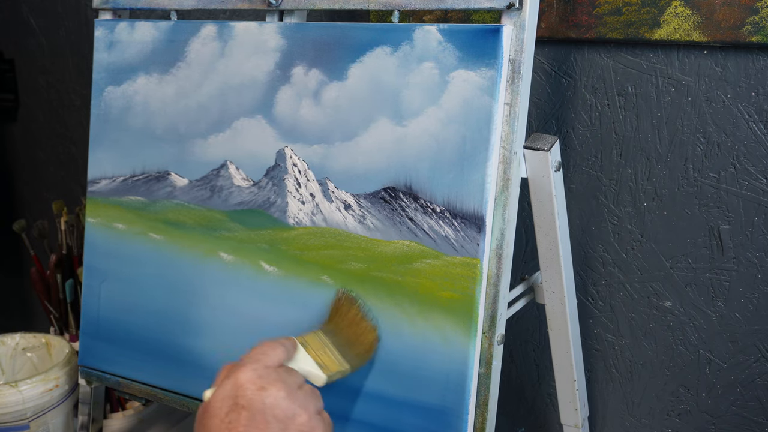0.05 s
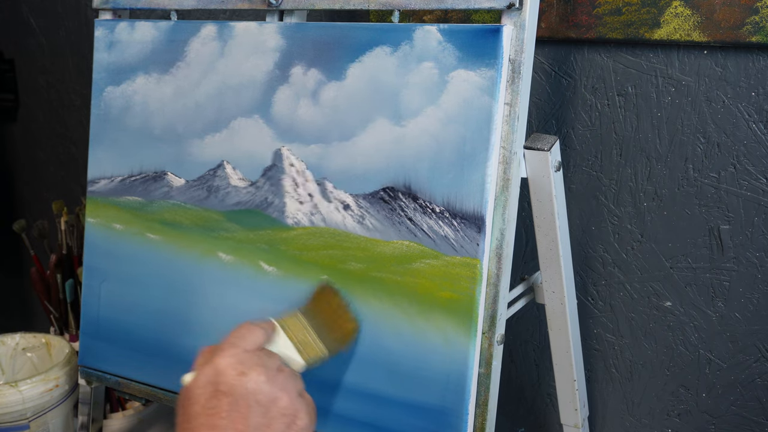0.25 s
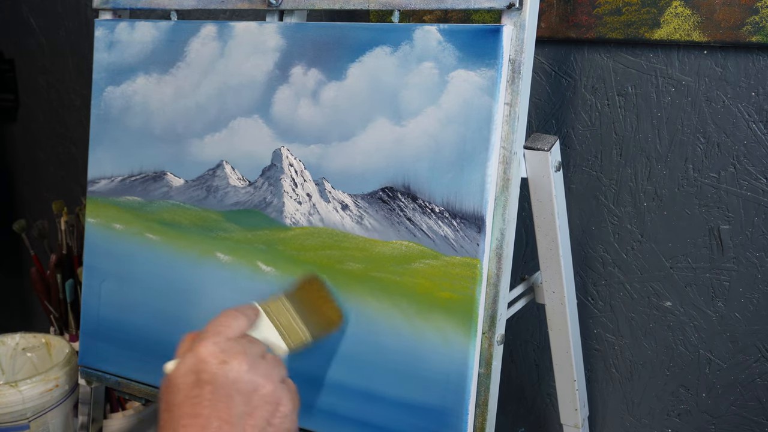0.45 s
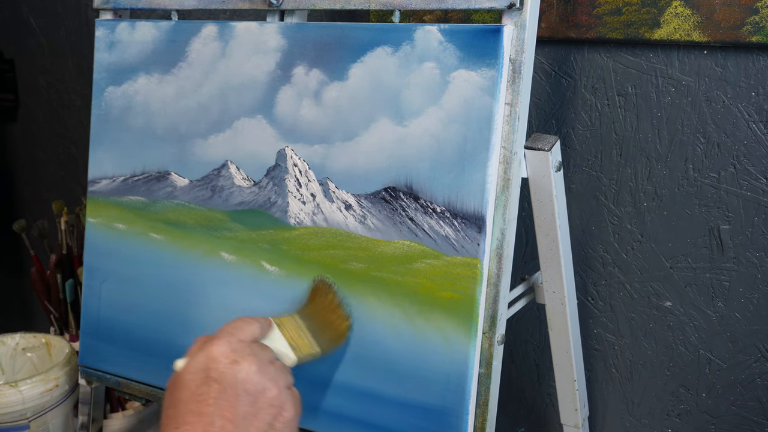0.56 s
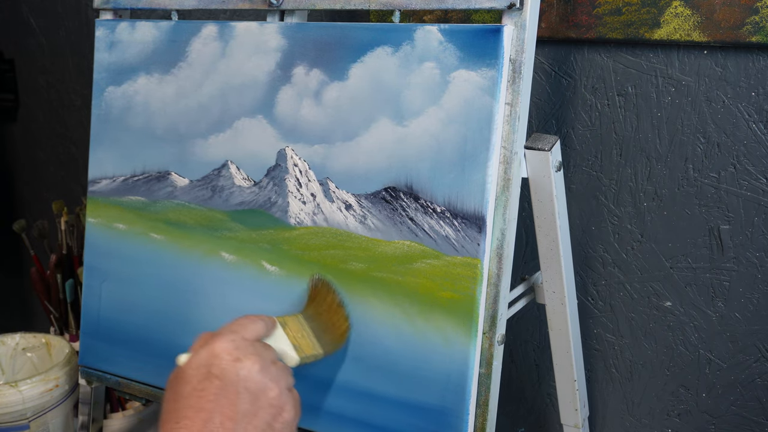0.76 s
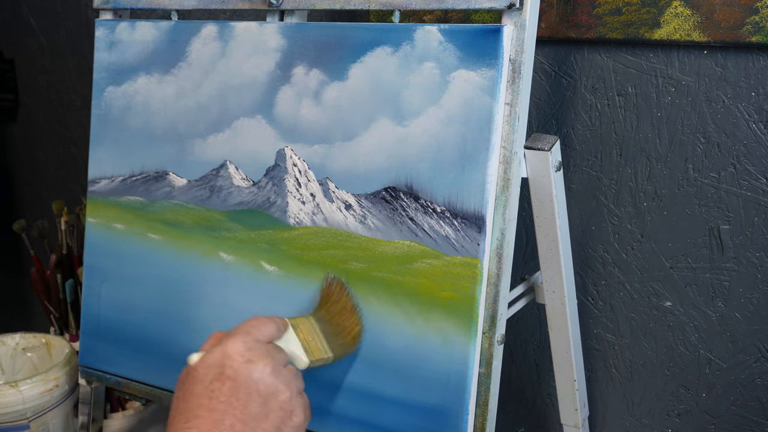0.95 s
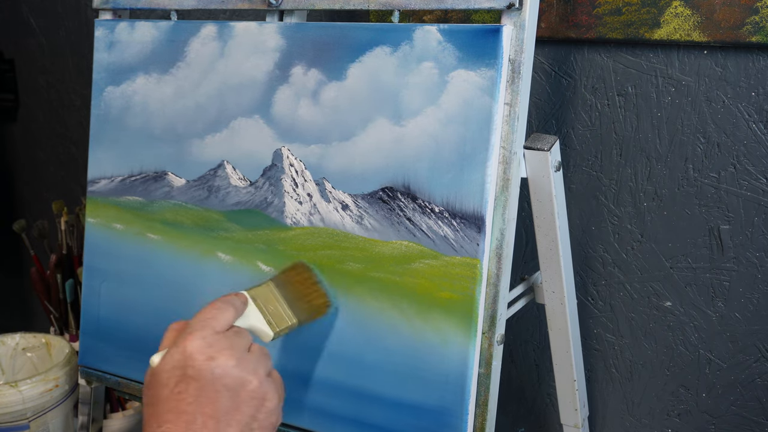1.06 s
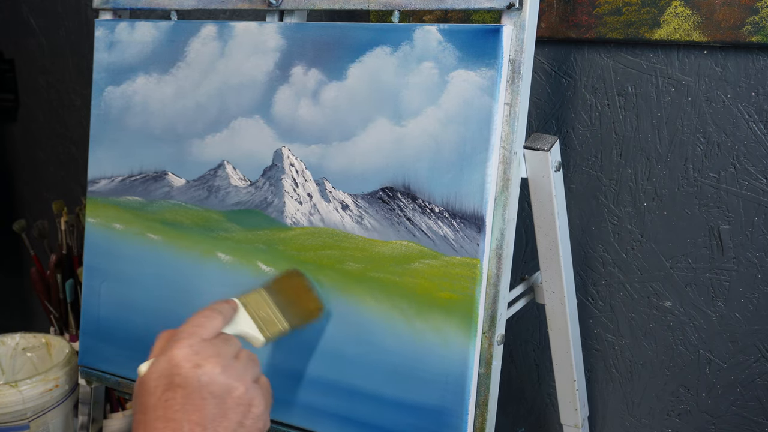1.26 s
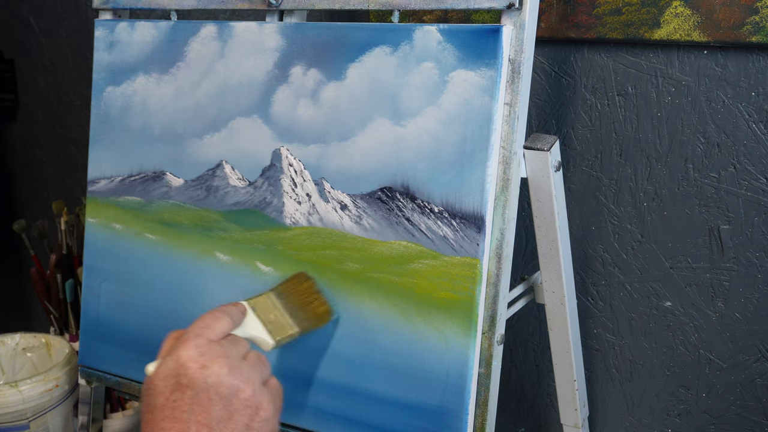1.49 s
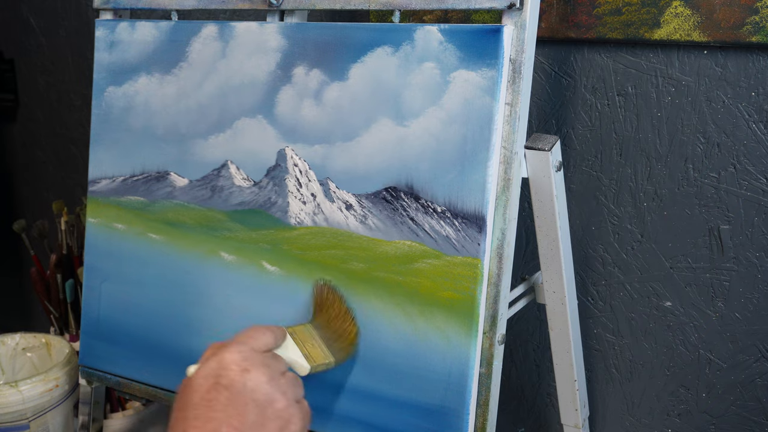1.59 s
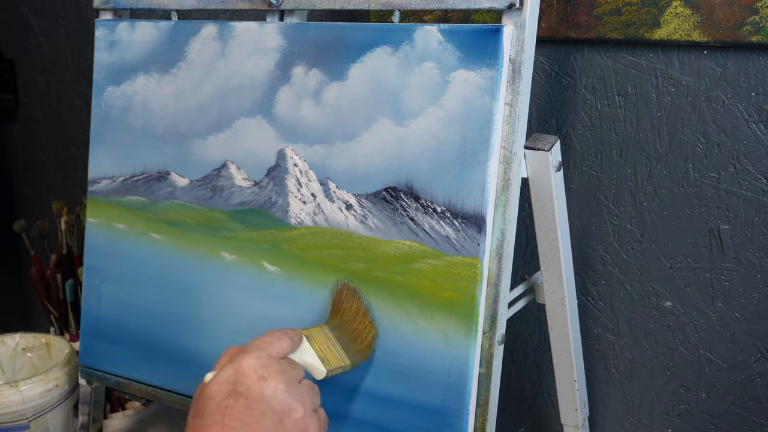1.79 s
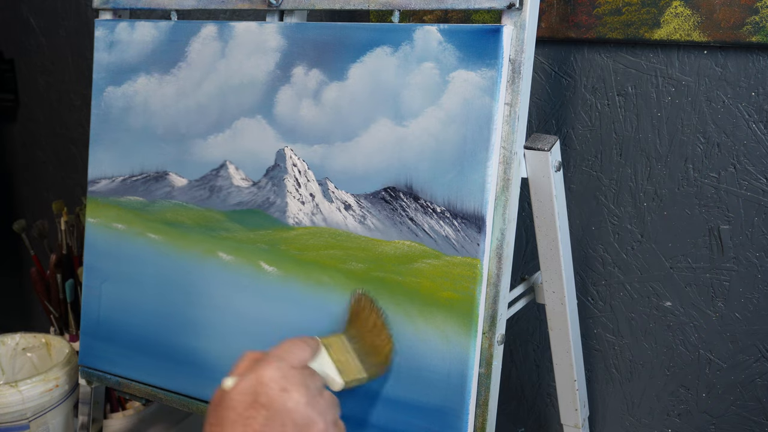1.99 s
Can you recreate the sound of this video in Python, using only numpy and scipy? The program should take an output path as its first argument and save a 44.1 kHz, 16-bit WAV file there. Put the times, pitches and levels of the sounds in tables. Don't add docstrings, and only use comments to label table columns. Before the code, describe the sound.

Soft wide paintbrush dabbing a stretched canvas in quick, steady strokes in a quiet studio

```python
import sys
import numpy as np
from scipy import signal
from scipy.fft import rfft, irfft, next_fast_len
from scipy.io import wavfile
from scipy.ndimage import uniform_filter1d

SR = 44100
rng = np.random.default_rng(int(sys.argv[2]) if len(sys.argv) > 2 else 0)


def ratio(d):
    e = np.asarray(d, float) / 20
    return 10 ** e


def master_out(mix):
    frames = np.transpose(np.atleast_2d(mix))
    ceiling = np.clip(frames, -1, 1)
    pcm = np.round(ceiling * 32767).astype(np.int16)
    wavfile.write(sys.argv[1], SR, pcm)


N = 89611
TIME_S = np.arange(N) / SR


def rms_one(x):
    return x / np.sqrt(np.mean(x ** 2) + 1e-20)


def colour(x, points, peaks=()):
    size = next_fast_len(N + SR // 2)
    size += size % 2
    hz = np.maximum(np.fft.rfftfreq(size, 1 / SR), 1)
    point_hz, point_db = np.array(points).T
    db = np.interp(np.log(hz), np.log(point_hz), point_db)
    for peak_hz, width_hz, peak_db in peaks:
        db = db + peak_db / (1 + (2 * (hz - peak_hz) / width_hz) ** 2)
    cepstrum = irfft(db * np.log(10) / 20, size)
    cepstrum[1:size // 2] *= 2
    cepstrum[size // 2 + 1:] = 0
    response = np.exp(rfft(cepstrum))
    return rms_one(irfft(rfft(x, size) * response, size)[:N])


def grains(per_s, spread_db):
    sizes = ratio(spread_db * np.minimum(rng.exponential(1, N), 5))
    signs = rng.choice([-1, 1], N)
    return rms_one(sizes * signs * (rng.random(N) < per_s / SR))


def ring(clicks, hz, t60_s):
    radius, angle = ratio(-60 / (t60_s * SR)), 2 * np.pi * hz / SR
    return signal.lfilter([0, np.sin(angle)], [1, -2 * radius * np.cos(angle), radius * radius], clicks + 1e-18)


# landing t/s, landing level/dB, full pressure after t/s, pressure level/dB, lift-off after t/s
DAB_STROKES = [(-.140, 0, 0.099, 3.5, 0.16), (0.073, -6.5, 0.04, -1, 0.16), (0.287, -9.5, 0.051, -1, 0.16),
               (0.511, -5, 0.04, -0.5, .150), (.712, -3.5, 0.047, 0, 0.15), (0.93, -2, 0.034, 0.5, 0.14),
               (1.146, 2.5, 0.035, -1, 0.15), (1.363, -1, 0.034, 0, 0.159), (1.566, -2.5, 0.042, 1, 0.17),
               (1.781, -3, 0.042, 0.5, 0.16), (2.007, -1.5, 0.025, -0.5, 0.12)]


def dab_gain(levels_db):
    touch_s, settle_s, ease_s, leave_s = 0.0019, 0.014, 0.043, 0.027
    splay_s, hold_s, unbend_s = 0.014, 0.0037, 0.02
    land, settle, splay, full, unbend, eased, lift, gone = levels_db
    points = []
    for land_s, land_db, press_after_s, press_db, lift_after_s in DAB_STROKES:
        press_s, lift_s = land_s + press_after_s, land_s + lift_after_s
        points += [
            (land_s - touch_s, gone),
            (land_s, land + land_db),
            (land_s + settle_s, settle + land_db),
            (press_s - splay_s, splay + press_db),
            (press_s - hold_s, full + press_db),
            (press_s + hold_s, full + press_db),
            (press_s + unbend_s, unbend + press_db),
            (press_s + ease_s, eased + press_db),
            (lift_s, lift),
            (lift_s + leave_s, gone)]
    return ratio(np.interp(TIME_S, *np.transpose(points)))


# landing, settled, splayed, full pressure, unbending, eased, lift-off, gone level/dB
HISS_STAGES = (-51, -48.5, -49, -47, -50.5, -60.5, -55.5, -75)
TICK_STAGES = (-47, -56, -48.5, -41, -51.5, -59.5, -61.5, -83)
SIZZLE_STAGES = (-87, -71, -62, -63, -59, -99, -66, -103)
# f/Hz, density level/dB per Hz
HISS_SPECTRUM = [(880, -4.5), (1500, -6), (2220, -5), (3320, -5.5), (3770, -6), (7410, -11.5),
                 (10400, -13.5), (13900, -25), (15600, -40)]
TICK_SPECTRUM = [(300, -36), (700, -12), (1200, -3), (2200, -12.5), (4000, -21), (7000, -30),
                 (12000, -42.5)]
# f/Hz, width/Hz, level/dB
HISS_SHEEN = [(10590, 1700, -10.5), (13600, 2100, 3.5)]
# f/Hz, width/Hz, level/dB
WEAVE_MODES = [(883, 31, 12), (1180, 34, 4.5), (1600, 71, 2), (2180, 510, 7), (3016, 37, 7), (3203, 41, 13),
               (3790, 330, 12.5), (5310, 420, 10)]


def bristles():
    hairs_per_s, ticks_per_s, spread_db = 12000, 4000, 2.0
    uneven = ratio(1.2 * rms_one(uniform_filter1d(rng.standard_normal(N), size=400)))
    hiss = colour(grains(hairs_per_s, spread_db), [(500, -45.0)] + list(HISS_SPECTRUM), HISS_SHEEN)
    ticks = colour(grains(ticks_per_s, spread_db), TICK_SPECTRUM, WEAVE_MODES)
    sizzle = colour(grains(hairs_per_s, spread_db), [(5000, -35), (9000, 1), (13000, 2), (16000, 3)])
    scrub = hiss * dab_gain(HISS_STAGES) + ticks * dab_gain(TICK_STAGES)
    return uneven * scrub + sizzle * dab_gain(SIZZLE_STAGES)


# f/Hz, level/dB, t60/s
DRUM_MODES = [(188.7, -13.5, 0.11), (250, -8, 0.07), (280, -3.5, 0.045), (387.4, -1, 0.039),
              (443, -3.5, 0.046), (608, -5.5, 0.023)]
# landing, settled, splayed, full pressure, unbending, eased, lift-off, gone level/dB
DRUM_STAGES = (-50, -50, -47.5, -43, -48, -53, -63.5, -90)


def canvas_drum():
    soft = signal.butter(2, 700, fs=SR, output="sos")
    drum = np.zeros(N)
    for hz, db, t60_s in DRUM_MODES:
        tugs = signal.sosfilt(soft, grains(350, spread_db=1.0))
        drum += ratio(db) * ring(tugs, hz, t60_s)
    return rms_one(drum) * dab_gain(DRUM_STAGES)


# landing, settled, splayed, full pressure, unbending, eased, lift-off, gone level/dB
RUMBLE_STAGES = (-97, -55, -57, -64, -61.5, -59.5, -67.5, -76)


def cloth_rumble():
    spectrum = [(30, -38), (70, -3), (110, -3.5), (170, -5.0), (400, -35.0)]
    return colour(rng.standard_normal(N), spectrum) * dab_gain(RUMBLE_STAGES)


# f/Hz, density level/dB per Hz
AIR_SPECTRUM = [(12, -75), (20, -6), (252, -0.5), (429, 0.5), (551, -1.5), (1170, -4.5), (2480, -7),
                (3770, -12.5), (15600, -27)]


def room_air():
    return ratio(-55.5 - 7.0) * colour(rng.standard_normal(N), AIR_SPECTRUM)


def screen_whine():
    return ratio(-86) * np.sin(2 * np.pi * 15733 * TIME_S)


# t/s, peak level/dB, low f/Hz, high f/Hz
SNAP_EVENTS = [(.0046, -36, 2240, 5570), (.0050, -53, 7500, 10100), (0.1198, -30.5, 590, 2480),
               (.2300, -41.5, 2500, 4900), (.3410, -44, 900, 3000), (.2860, -47, 1520, 5000),
               (.378, -57, 7000, 15200), (.584, -49, 9000, 15000), (0.8384, -40, 4300, 6550),
               (0.8386, -47, 8500, 10900), (.8440, -49, 4500, 6500), (0.9280, -37.5, 800, 6500),
               (1.3585, -38, 2200, 5900), (1.3587, -54, 7450, 9500), (1.4561, -52, 9000, 15000),
               (1.6040, -41, 2500, 8000), (1.6332, -45, 11600, 15200), (1.6335, -37.5, 2500, 9000),
               (1.818, -37, 1200, 5000), (1.8900, -39.5, 3000, 9500), (1.8900, -52, 13000, 15000)]


def snaps():
    rise_s, t60_s, length = 0.0004, 0.006, 600
    out, t = np.zeros(N + length), np.arange(length) / SR
    envelope = ratio(-60 * t / t60_s) * np.minimum(t / rise_s, 1)
    for s, db, low_hz, high_hz in SNAP_EVENTS:
        band = signal.butter(2, [low_hz, high_hz], "band", fs=SR, output="sos")
        crack = signal.sosfilt(band, rng.standard_normal(length) * envelope)
        start = int(s * SR)
        out[start:start + length] += ratio(db) * crack / np.abs(crack).max()
    return out[:N]


# t/s, peak level/dB,
# f/Hz
CATCH_EVENTS = [(0.075, -42, 1130), (0.112, -28, 540), (0.107, -32, 1377), (0.114, -37, 880),
                (0.119, -31, 1160), (0.322, -33, 1370), (0.332, -27, 1108), (0.341, -29, 1205),
                (0.511, -40, 1160), (0.534, -33, 1230), (0.543, -34, 1120), (0.745, -33.5, 1287),
                (0.756, -31.5, 1170), (0.928, -37.5, 880), (0.962, -46, 850), (0.965, -39, 1180),
                (1.145, -58, 1270), (1.168, -35, 1600), (1.185, -28, 1250), (1.395, -29.5, 1220),
                (1.401, -37.5, 610), (1.401, -27, 1280), (1.567, -45, 1120), (1.592, -51, 940),
                (1.605, -45, 1810), (1.607, -30, 1270), (1.619, -35, 1170), (1.806, -39, 1180),
                (1.821, -34, 1180), (1.832, -43, 1310), (2.007, -48, 1220), (2.025, -35, 1210),
                (.513, -44, 3750), (.584, -41, 3730), (1.568, -41, 3830), (1.78, -47, 3770),
                (1.397, -32, 1850), (.286, -48, 2200), (1.822, -37, 2140), (.878, -45, 800)]


def catches():
    rise_s, t60_s, gain_db, length = 0.0025, 0.026, -1.5, 600
    out, t = np.zeros(N + length), np.arange(length) / SR
    envelope = ratio(gain_db - 60 * t / t60_s) * np.minimum(t / rise_s, 1)
    for s, db, hz in CATCH_EVENTS:
        start = int(s * SR)
        out[start:start + length] += ratio(db) * envelope * np.sin(2 * np.pi * hz * t)
    return out[:N]


# t/s, peak level/dB
PAT_EVENTS = [
    (0.077, -47.5),
    (.286, -45.5),
    (0.513, -42),
    (.713, -67),
    (0.929, -33),
    (1.144, -49),
    (1.364, -53),
    (1.568, -43),
    (1.78, -40),
    (2.008, -39),
]


def pats():
    pitch_hz, sweep_s, t60_s = 153, 0.0068, 0.024
    s, db = np.array(PAT_EVENTS).T[:, :, None]
    t = np.maximum(TIME_S - s, 0)
    sagging = np.sin(2 * np.pi * pitch_hz * np.sqrt(t * sweep_s))
    return np.sum(ratio(db - 60 * t / t60_s) * sagging, axis=0)


# t/s, peak level/dB
REBOUND_EVENTS = [
    (.150, -55),
    (0.365, -54),
    (.580, -55),
    (0.786, -55),
    (.999, -52),
    (1.210, -58),
    (1.430, -50),
    (1.637, -51),
    (1.854, -56),
]


def stretcher():
    width_s, give_before_s, give_db = 0.0091, 0.057, -10
    rebound = np.array(REBOUND_EVENTS)
    give = rebound + [-give_before_s, give_db]
    s, db = np.concatenate([rebound, give]).T[:, :, None]
    u = ((TIME_S - s) / width_s) ** 2
    return np.sum(ratio(db) * (1 - u) * np.exp(-u / 2), axis=0)


# t/s, peak level/dB, f/Hz
TUG_EVENTS = [(0.102, -36, 192), (0.13, -38.5, 250), (0.149, -38.5, 242), (0.202, -37, 282),
              (0.318, -33, 280), (0.328, -29, 436), (0.369, -32.5, 240), (0.383, -38.5, 253),
              (0.411, -43.5, 277), (0.533, -39, 455), (0.541, -34.5, 310), (0.728, -40, 356),
              (0.747, -31.5, 302), (0.782, -38, 192), (0.954, -32.5, 276), (0.960, -26.5, 437),
              (0.966, -36.5, 438), (1.009, -35, 259), (1.015, -41, 447), (1.16, -31.5, 216),
              (1.174, -30, 258), (1.213, -37, 220), (1.392, -28.5, 229), (1.428, -39, 214),
              (1.443, -31.5, 258), (1.572, -36, 350), (1.597, -49, 414), (1.632, -34, 205),
              (1.654, -35, 190), (1.816, -28.5, 280), (1.167, -37, 250), (1.182, -39.5, 238),
              (1.434, -37, 250), (1.85, -35, 192)]
# t/s, peak level/dB, f/Hz
FLAP_EVENTS = [(0.164, -39, 400), (0.18, -48, 275), (0.393, -48, 266), (0.429, -53, 269), (0.558, -62, 385),
               (0.575, -37, 334), (0.589, -38.5, 222), (0.609, -50, 248), (0.629, -60, 239),
               (0.764, -39, 377), (0.799, -40, 229), (0.819, -54, 200), (0.982, -42, 210),
               (1.028, -40, 262), (1.059, -41, 288), (1.195, -43, 234), (1.228, -47, 293), (1.25, -55, 312),
               (1.269, -64, 234), (1.414, -33, 265), (1.458, -37, 242), (1.48, -52, 253),
               (1.615, -36.5, 175), (1.674, -45, 180), (1.83, -43, 198), (1.868, -39.5, 264),
               (2.019, -46, 412)]


def thumps():
    lag_s, rise_s, t60_s, gain_db, flap_db = 0.0012, 0.0015, 0.032, 3, -2
    upper_ratio, upper_gain = 1.744, 0.22
    flaps = np.array(FLAP_EVENTS) + [0, flap_db, 0]
    s, db, hz = np.concatenate([np.array(TUG_EVENTS), flaps]).T[:, :, None]
    t = np.maximum(TIME_S - s - lag_s, 0)
    envelope = ratio(db + gain_db - 60 * t / t60_s) * (1 - np.exp(-t / rise_s))
    phase = 2 * np.pi * hz * t
    return np.sum(envelope * (np.sin(phase) + upper_gain * np.sin(upper_ratio * phase)), axis=0)


def studio(x):
    t60_s, level_db, gap_s = 0.5, -22.5, 0.006
    t = np.arange(int(0.4 * SR)) / SR
    dull = signal.lfilter([1], [1, -0.6], rng.standard_normal(len(t)))
    tail = dull * ratio(-60 * t / t60_s) * (t > gap_s)
    tail /= np.sqrt(np.sum(tail ** 2))
    return ratio(level_db) * signal.fftconvolve(x, tail)[:N]


def scene():
    cloth = canvas_drum() + cloth_rumble() + thumps()
    brush = bristles() + cloth + snaps() + catches() + pats() + stretcher()
    return (brush + studio(brush) + room_air() + screen_whine())[None]


def top_cut(x):
    return signal.sosfilt(signal.butter(12, 15750, fs=SR, output="sos"), x)


def record(dry):
    low_pass = signal.ellip(14, 0.5, 60, 15770, fs=SR, output="sos")
    mix = signal.sosfilt(low_pass, dry)
    return top_cut(mix)


dry = scene()
out = record(dry)
master_out(out)
```